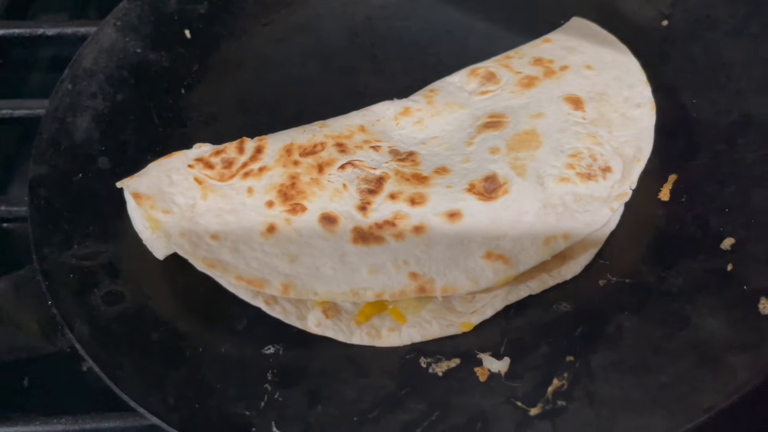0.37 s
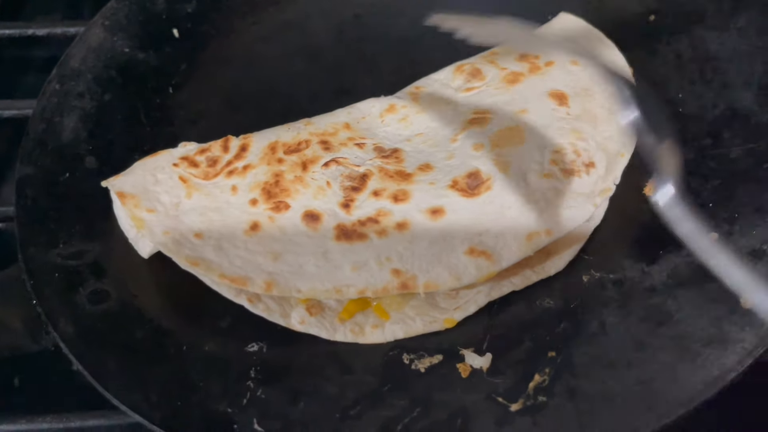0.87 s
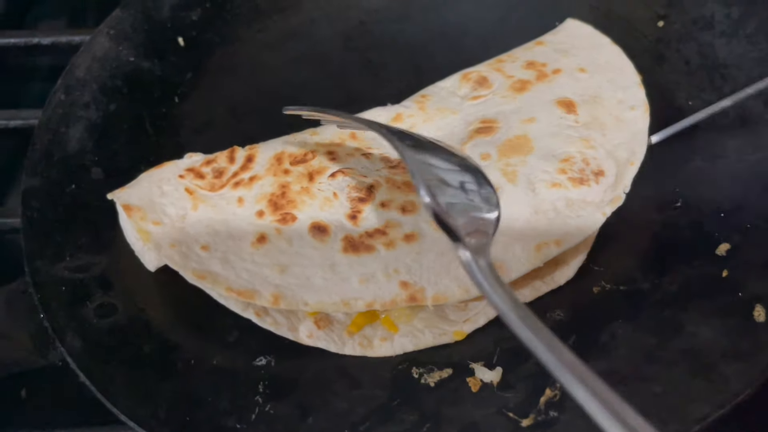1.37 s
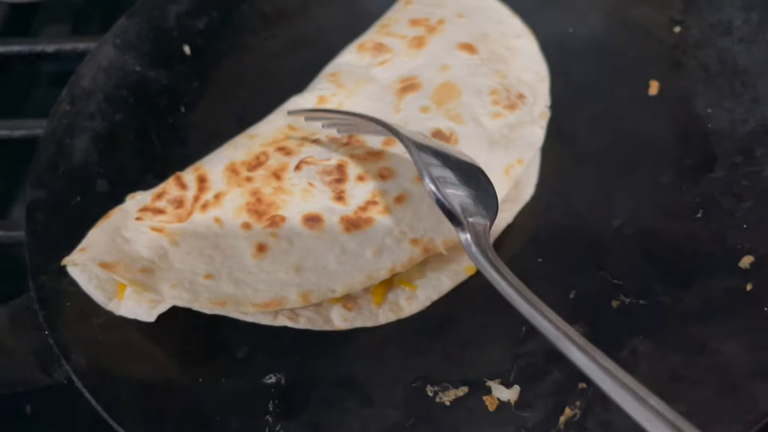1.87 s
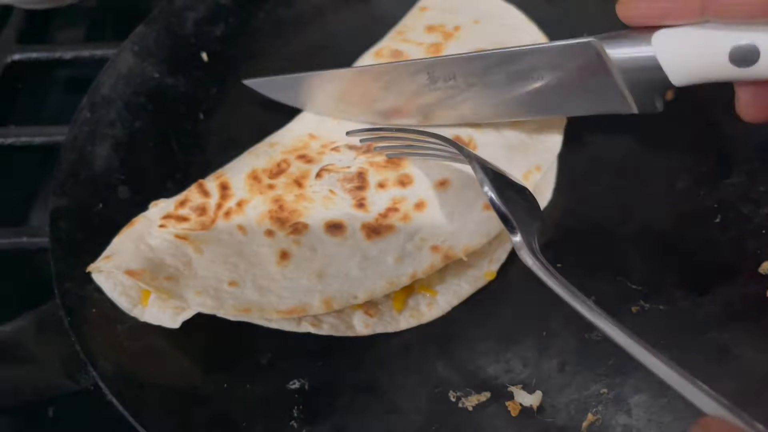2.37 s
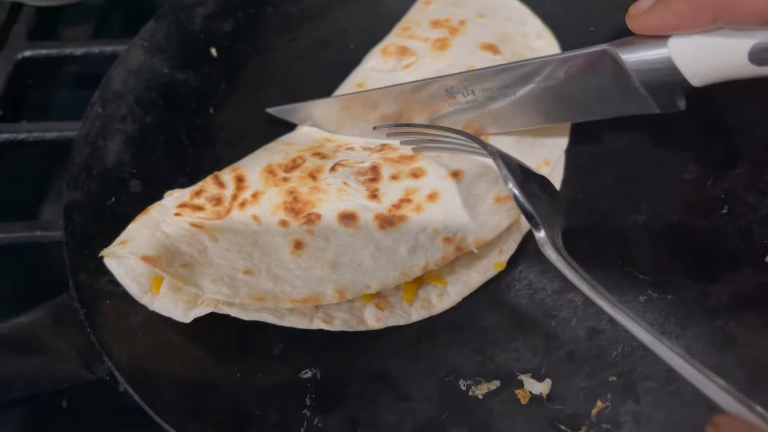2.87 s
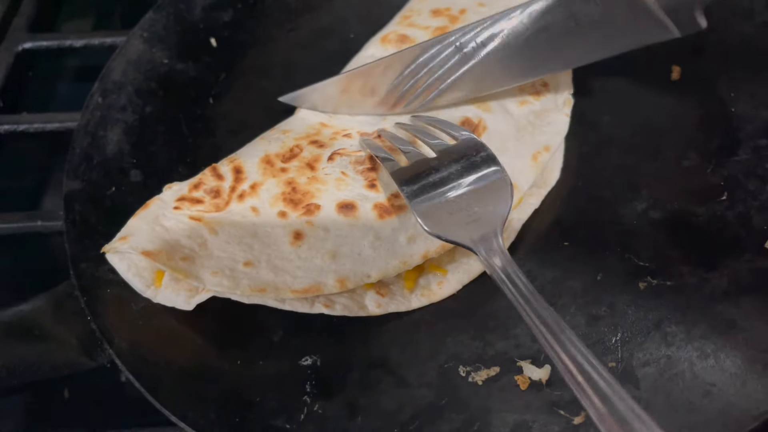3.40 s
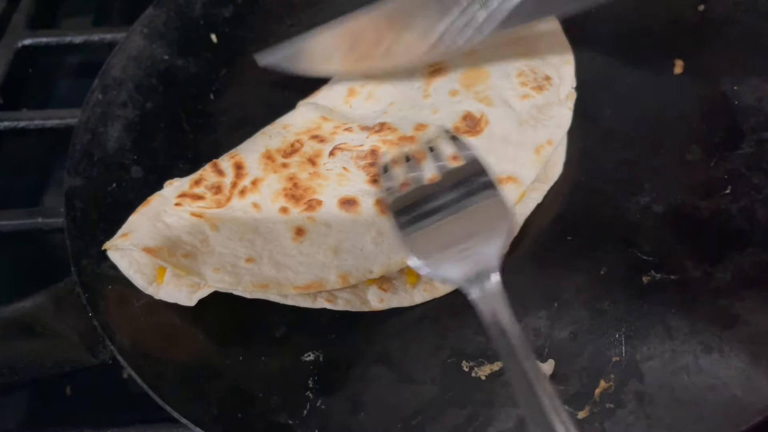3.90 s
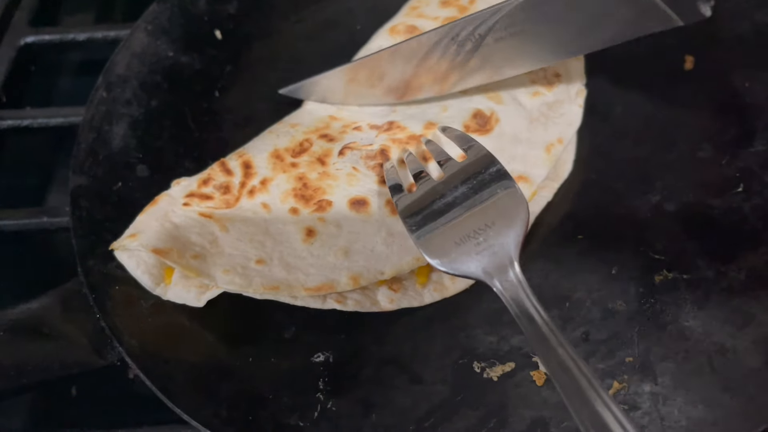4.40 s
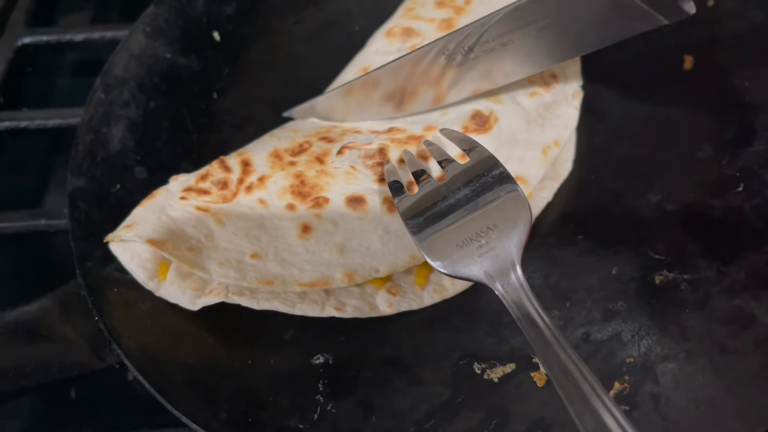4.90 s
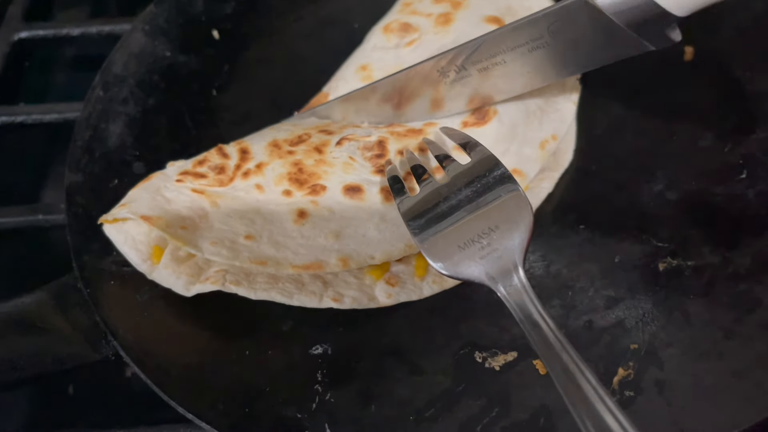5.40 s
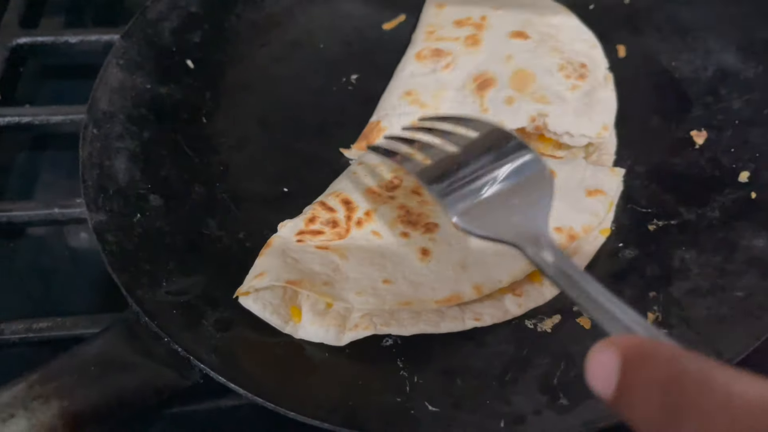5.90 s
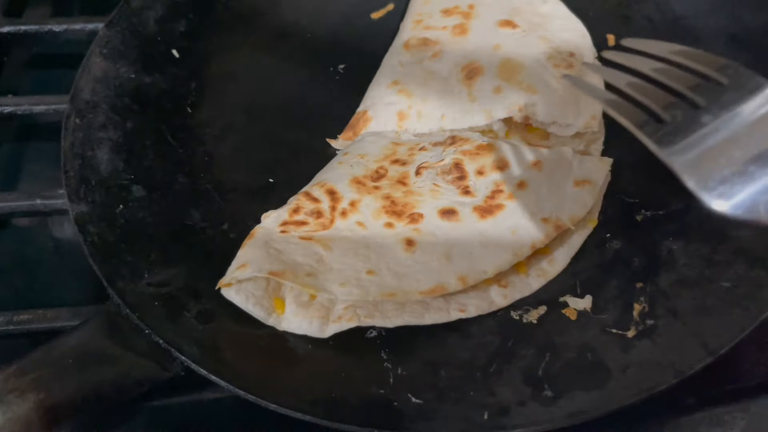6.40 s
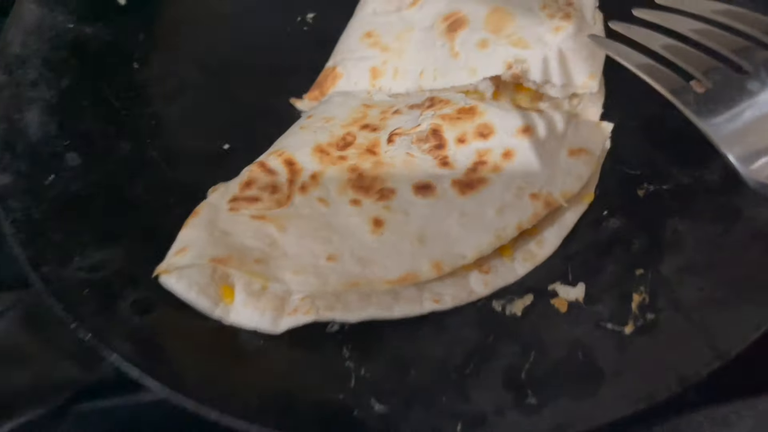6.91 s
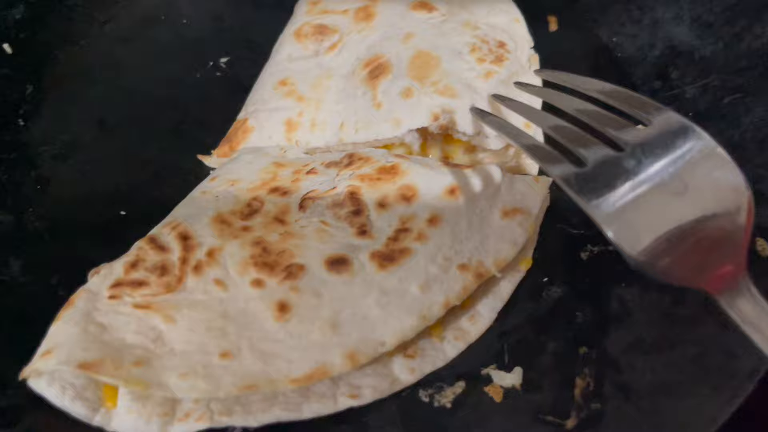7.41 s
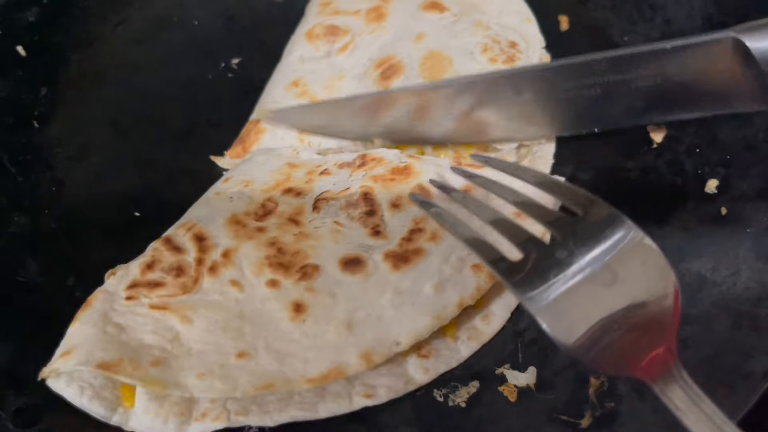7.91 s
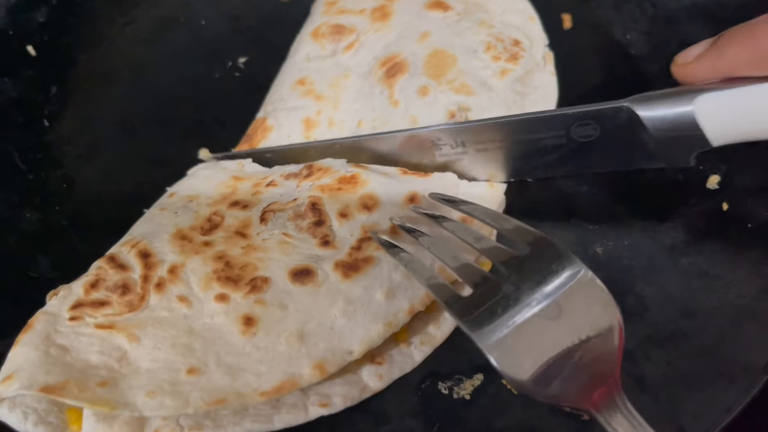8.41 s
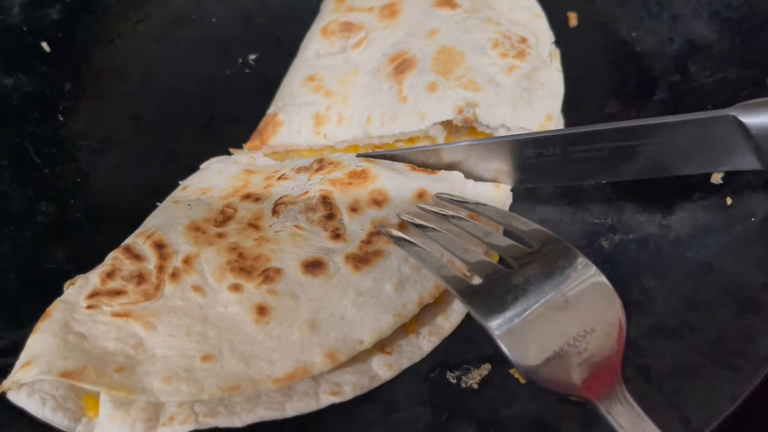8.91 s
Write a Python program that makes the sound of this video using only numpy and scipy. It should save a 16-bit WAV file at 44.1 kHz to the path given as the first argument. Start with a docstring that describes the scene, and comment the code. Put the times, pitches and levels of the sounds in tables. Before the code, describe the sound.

Close up in a quiet kitchen, a knife and fork saw crusty flatbread on an iron pan, with clicks, scrapes, thumps and loud ringing taps.

```python
"""In a quiet kitchen, heard from close by, a knife and fork work on a crisp flatbread in a flat iron pan.
The blade knocks, taps and drags on the iron: blows and tiny uneven slips make its many modes ring.
It saws the crust and clicks on the fork in the same two ways; a few thin squeaks are fluttering sines.
The pan judders on its grate with a deep thump; soft low puffs of noise, rumble, hum and hiss lie below.
At one moment the ringing of the cutlery and pan, the puffs and the echoes so far stop short."""
import sys
import numpy as np
from scipy import signal
from scipy.fft import rfft, irfft, next_fast_len
from scipy.io import wavfile
from scipy.ndimage import uniform_filter1d

SR = 44100
rng = np.random.default_rng(int(sys.argv[2]) if len(sys.argv) > 2 else 0)


def unload_wav(signal):
    """Save mono or channel-first audio to the path in sys.argv[1] as 16-bit WAV at rate SR, clipped to [-1, 1]."""
    wavfile.write(
        sys.argv[1],
        SR,
        np.round(np.clip(np.atleast_2d(signal).T, -1, 1) * 32767).astype(np.int16),
    )


def field_ratio(decibels):
    """Amplitude ratio for a level in dB (20 dB per decade); scalars and array-likes work."""
    return 10 ** (np.asarray(decibels, dtype=float) / 20)


N = 398223
T = np.arange(N) / SR
CUT_S = 5.709  # the moment when ringing stops short

# Levels in these tables are those before the room, the ports and the overall colour.
# background treble over time: t/s, hiss level/dB, fizz level/dB
TREBLE_LEVEL = [(0.0, -60.5, -62.5), (0.2, -61, -58.5), (0.34, -66.5, -60.5), (1.18, -70.5, -63),
                (1.72, -77.5, -72), (2.3, -69.5, -73), (3.099, -70.5, -72), (3.949, -76, -73),
                (4.599, -76, -72.5), (5.24, -60.5, -63), (5.7, -77.5, -72.5), (5.721, -78.5, -88),
                (6.139, -77.5, -67.5), (6.3, -80, -80), (7.3, -79.5, -77.5), (7.902, -81, -81)]
# colour of the low rumble: f/Hz, relative level/dB
RUMBLE_COLOUR = [(15, -35), (25, -18), (54, -1.5), (102, -7.5), (229, -2.5), (386, -13.5), (409, -12.5),
                 (515, -17.5), (674, -26.5), (900, -30), (1730, -45), (2230, -54), (2500, -56), (3250, -83),
                 (5500, -120)]
# colour of the hiss: f/Hz, relative level/dB
HISS_COLOUR = [(300, -3.5), (1000, -9), (1600, -11.5), (2300, -5.5), (4000, -9.5), (6500, -3),
               (8000, -10.5), (11000, -31.5)]
# hum tones, before they waver: f/Hz, rms level/dB
HUM_TONES = [(51, -62.5), (392, -72.5)]
# how alike the background is left and right: f/Hz, likeness (0 to 1)
LIKENESS = [(60, 0.29), (130, 0.98), (290, 0.79), (640, 0.14), (1410, 0.16), (3100, 0.43), (6820, 0.24),
            (15000, 0.087)]
# modes of the pan rocking on its grate: f/Hz, relative level/dB, time to fall 60 dB/s
GRATE_MODES = [(164.7, 8.5, 0.077), (266, 1, 0.29), (328, 2, 0.17), (393, -2, 0.075), (475, -12, 0.088),
               (586, -4.5, 0.11), (732, -26, 0.17), (826, -11.5, 0.27), (992, -14.5, 0.16)]
# jolts of the pan on the grate: peak t/s, rise/s, fall/s, judder level/dB
GRATE_JOLTS = [(5.154, .03, 0.12, -62), (5.294, 0.0043, 0.12, -40), (5.587, 0.013, 0.058, -32),
               (5.684, 0.0049, 0.034, -32), (5.748, .005, 0.16, -50.5), (5.934, 0.0068, 0.13, -49),
               (6.112, .006, 0.14, -51), (6.36, .2, 0.037, -67.5), (6.522, 0.081, .4, -63.5),
               (6.928, .11, 0.073, -59), (7.051, 0.023, 0.023, -48.5)]
# deep thump while the pan slides: t/s, level/dB
THUMP_LEVEL = [(5.1, -87), (5.154, -47.5), (5.26, -65.5), (5.299, -49), (5.42, -43), (5.58, -64),
               (5.66, -54), (5.83, -65), (5.93, -56), (6.3, -61.5), (6.449, -64), (6.85, -53.5), (7.0, -56),
               (7.07, -72), (7.14, -59.5), (7.3, -56.5), (7.341, -87.5)]
# soft low puffs, the body of a knock and of pan taps, and dull bumps: t/s, peak level/dB, centre f/Hz
LOW_PUFFS = [(1.204, -37, 328.7), (5.745, -46, 1240), (5.935, -47, 1230), (6.11, -50, 1250),
             (6.553, -49, 474), (6.572, -48, 538), (6.649, -58, 533), (6.729, -58.5, 444),
             (6.894, -55.5, 810), (7.023, -64.5, 515), (7.054, -53, 509), (7.438, -54.5, 520)]
# faint squeaks, level before flutter: start t/s, length/s, f/Hz, level/dB
SQUEAK_TONES = [(0.123, 0.19, 5510, -56.5), (0.224, 0.12, 4780, -64), (1.65, 0.06, 4950, -61),
                (3.64, 0.062, 5600, -64), (3.79, 0.034, 9140, -54.5), (3.84, 0.054, 9120, -55),
                (3.878, 0.02, 4800, -55), (4.195, 0.043, 4930, -55), (4.2, 0.043, 8370, -59),
                (4.27, 0.055, 5020, -59), (4.275, 0.071, 9200, -62), (7.541, 0.094, 879, -66.5)]
# modes of the cutlery, before each use shortens them: f/Hz; relative level/dB; time to fall 60 dB/s
STEEL_HZ = [1270, 1440, 2299, 3100, 3806, 4920, 6830, 8290, 9090, 11386, 11445, 12255, 13040, 14700]
STEEL_DB = [5, -6.5, -18, -7, -9.5, -6, -6, -11, -3.5, -5, 7, -19, -5.5, 6]
STEEL_T60 = [0.019, 0.063, 0.057, 0.045, 0.076, 0.065, 0.041, 0.22, 0.099, 0.079, 0.033, 0.24, 0.41, 0.1]
# modes of the iron pan, before each use shortens them: f/Hz; relative level/dB; time to fall 60 dB/s
PAN_HZ = [250, 335, 400, 600, 711, 822, 1000, 1290, 1420, 2014, 2369, 2560, 2830, 3143, 3216, 3381, 3682,
          3811, 4220, 4359, 4410, 4705, 5235, 5453, 5566, 6315, 6923, 7230, 7458, 7518, 7566, 8030, 8390,
          8689, 9998, 11060, 11343, 11745, 11910, 12040, 12800, 13290]
PAN_DB = [-31.5, -19.5, -28, -29, -14.5, -15.5, -21, -25, -27.5, -12.5, -10.5, -7.5, -8.5, -9.5, -10, -27.5,
          -11, -11.5, -20.5, -9.5, -14.5, -15.5, -3.5, -24.5, -19, -19, -14, -19, -15, -14, -10.5, -14, -17,
          -12, 5.5, -21.5, -3, -5, -14.5, -16.5, -17, -3.5]
PAN_T60 = [0.12, 0.13, .15, 0.5, 0.082, 0.15, .08, 0.051, 0.09, 0.19, 0.068, 0.15, 0.094, 0.089, .1, 0.13,
           .16, .12, 0.059, 0.097, .1, 0.18, 0.064, 0.13, 0.079, 0.12, .07, .06, 0.075, .1, 0.1, .1, 0.12,
           .1, 0.036, .12, 0.044, 0.021, .06, 0.063, 0.065, 0.068]
# colour of the gritty noise in rubbing: f/Hz, relative level/dB
GRIT_COLOUR = [(300, -32.5), (700, -5.5), (1300, 1.5), (1800, -5.5), (2600, 1), (5000, -1), (8000, -9),
               (16000, -13.5)]
# a drag also lifts modes above the favoured one: frequency ratio, share of the lift
OVERTONE_LIFTS = [(1.72, .6), (2.06, 0.36)]
# blade strokes and fork presses on the crust: peak t/s, rise/s, fall/s, dull level/dB, bright level/dB
CRUST_STROKES = [(2.145, 0.0089, 0.11, -65.5, -74), (2.35, 0.011, 0.034, -59, -75),
                 (2.439, 0.04, 0.045, -54.5, -51.5), (2.598, 0.015, 0.054, -62, -59.5),
                 (2.645, 0.011, .06, -49, -52), (2.7, 0.042, 0.037, -52.5, -52.5),
                 (2.89, 0.023, 0.045, -72, -66.5), (3.078, 0.031, 0.079, -61, -55),
                 (3.195, 0.06, .04, -63, -60), (3.286, 0.088, 0.09, -49.5, -47.5),
                 (3.36, .035, 0.043, -54.5, -49), (3.58, 0.063, 0.063, -67.5, -64),
                 (3.66, 0.045, 0.13, -54, -58), (3.8, 0.064, 0.099, -57, -54.5),
                 (3.866, 0.05, 0.049, -63, -57), (4.04, .015, 0.024, -62, -62.5),
                 (4.127, 0.014, 0.024, -60.5, -58), (4.215, .025, 0.034, -59.5, -54),
                 (4.294, 0.038, 0.032, -61, -55.5), (4.675, .008, 0.033, -71, -72),
                 (4.801, .012, 0.058, -57.5, -62), (4.835, .022, 0.15, -67, -70),
                 (4.932, 0.066, 0.03, -64, -63.5), (5.089, 0.0099, 0.038, -55, -62),
                 (5.06, 0.04, .03, -58.5, -69), (5.19, 0.0096, 0.027, -53.5, -60),
                 (5.237, 0.045, 0.023, -58, -46.5), (5.309, 0.04, .13, -59, -55),
                 (5.546, 0.053, .08, -56, -48.5), (5.64, 0.11, 0.071, -58.5, -54),
                 (5.689, 0.022, 0.079, -46.5, -62), (6.04, 0.033, 0.039, -75, -69),
                 (6.2, 0.12, .1, -83, -62.5), (7.07, .025, 0.046, -73, -67)]
# stretches of work on the crust: start t/s, end t/s
CRUST_TIMES = [(2.13, 5.709), (6.0, 6.36), (7.0, 7.15)]
# cutlery resting on the crust, before the cut: dull, middle and bright level/dB
RESTING_LEVEL = [-77.5, -75, -82]
# blade dragged over iron, one table a drag: t/s, level/dB, favoured mode f/Hz, its lift/dB
BLADE_DRAGS = [
    [(1.21, -32, 2850, 25), (1.258, -40, 2760, 13), (1.314, -28, 2590, 22), (1.42, -34, 2480, 14.5),
     (1.49, -25, 2550, 21), (1.548, -41, 2710, -1.5), (1.644, -46, 2870, 0.5), (1.7, -79, 2570, 10)],
    [(7.95, -90, 3010, 3), (7.975, -62.5, 2760, 3), (8.078, -40, 2330, 7), (8.146, -40.5, 2720, 3),
     (8.208, -58, 2540, 15), (8.308, -44.5, 2630, 19), (8.37, -54, 2770, 7)],
    [(8.66, -79.5, 3360, 18), (8.712, -54, 3240, 13), (8.798, -49.5, 3000, -3), (8.864, -50, 2540, 5),
     (8.966, -67, 2870, -1), (8.996, -50.5, 2730, 3), (9.03, -49, 2940, 20)],
]
# tone of each drag: dull over middle level/dB, bright over middle level/dB, grit over ringing level/dB
DRAG_TONE = [(-12.5, 0.5, -6.5), (-10, -3, 4.5), (-13, 2, -7)]
# clicks of cutlery and breaking crust:
# t/s, peak level/dB, treble slope/(dB per octave), favoured mode f/Hz, crack over ring level/dB
CUTLERY_CLICKS = [(0.3705, -48.5, 3, 11500, -2), (0.5394, -51.5, -3, 11400, -3.5),
                  (1.6454, -31, -2.5, 8400, -3), (2.1347, -40.5, -13.5, 1217, -4.5),
                  (2.3486, -46.5, -13, 1393, -7), (2.5948, -49, -4.5, 9200, -6),
                  (2.6368, -31.5, -1, 1440, 0), (2.6693, -34.5, -4.5, 11830, -5),
                  (2.9796, -46, -9.5, 1270, 1.5), (2.9919, -20.5, 0, 2299, -1.5),
                  (3.1916, -36, -3.5, 3100, 11), (3.3398, -26, -5.5, 1430, 4),
                  (3.3882, -42, -10.5, 1270, -10), (3.5334, -47.5, -11, 9160, -1.5),
                  (3.5603, -47, -7.5, 1440, 0), (4.018, -33.5, -6.5, 1313, 4), (4.6064, -47, 4.5, 11630, 4),
                  (4.6699, -38, -5, 5500, 25.5), (4.775, -46, -12, 1440, 1), (4.7904, -34.5, -3, 10970, 4),
                  (4.8186, -40, -13, 1540, 3.5), (4.8403, -36.5, -9.5, 1440, -1),
                  (5.0264, -41.5, -7, 1510, -1), (5.0822, -39.5, -2, 1870, -8), (5.1825, -32.5, 0, 1440, 9),
                  (5.2273, -33, 1, 10370, 10), (5.292, -39.5, -24, 1260, 11), (5.3225, -45.5, -5, 12100, 5),
                  (5.378, -38.5, -1, 11500, 19), (5.5193, -43.5, -13, 1800, 12),
                  (5.533, -35, -18.5, 2300, 5), (5.5523, -25, -5, 11600, 4), (5.5634, -24, 31, 13300, -19),
                  (5.6506, -46, -24, 11400, 5), (5.7084, -36.5, -7, 1120, -3), (5.985, -51, 3.5, 4920, 13),
                  (7.0536, -49.5, -4, 1110, 7), (7.33, -60.5, -11.5, 2299, 15),
                  (7.438, -57.5, -10, 1270, 4), (7.8214, -49.5, 4, 11220, 7.5),
                  (8.6153, -45.5, -1, 2930, 19), (8.9491, -34, 3, 12000, 22), (8.972, -52, -7, 4920, 5)]
# knocks, soft taps and large slips of the drag, all ringing the pan:
# t/s, peak level/dB, treble slope/(dB per octave), favoured mode f/Hz, crack over ring level/dB
PAN_STRIKES = [(1.2027, -8.5, -2.5, 2730, -7), (1.2214, -17, -4, 2490, -4.5),
               (1.297, -21.5, -2.5, 2560, -17), (1.33, -22, -2.5, 2540, -2.5),
               (1.362, -27.5, 4.5, 2630, -12), (1.3976, -29, 0.5, 2500, 2), (1.4735, -17, 5.5, 2560, -5),
               (5.5844, -37, -29, 2480, -15), (5.682, -42, -19.5, 2560, -13),
               (5.7448, -37.5, -18, 2830, -15), (5.9344, -40.5, -24, 2830, -17),
               (6.109, -51.5, -21, 2830, -15), (7.9374, -43.5, -6.5, 3720, -8),
               (8.3714, -35.5, -7, 2520, 3), (8.3814, -1, 2, 3100, -5), (8.3964, -2, -1, 3340, -2),
               (8.4074, -6.5, 0.5, 2840, -9), (8.991, -36, -6.5, 2670, 11.5)]
# left port ahead of right: f/Hz, phase/rad
LEFT_LEADS = [(0, 0.5), (1640, -0.2), (2330, 0.96), (3620, 0.91), (5250, 1.5), (5600, -7), (6030, 0.82),
              (8870, 0.52), (9820, -2.5), (12500, -6.5), (13200, -7.5), (14400, -14), (14900, -8.5),
              (16200, -6.5)]
# left port louder than right: f/Hz, level/dB
LEFT_LOUDER = [(60, 1), (110, 8.5), (200, -3.5), (380, 5), (700, 5.5), (1290, 2), (2380, 5), (4400, 2),
               (8120, 1.5), (15000, -1)]
# overall colour, with a notch near 10 kHz, a peak near 11 kHz and a steep treble fall: f/Hz, level/dB
OVERALL_COLOUR = [(8500, -1.5), (9750, 0), (10050, -11.5), (10350, -16.5), (10700, 5.5), (11500, 3.5),
                  (12700, -3.5), (13600, -29), (14900, -16), (15700, -22), (16400, -63)]


def evened(x):
    """Scales a sound to an rms of 1."""
    return x / np.sqrt(np.mean(x ** 2) + 1e-20)


def read(points, hz):
    """Reads a table between its points, along a log frequency scale."""
    f, value = np.transpose(points)
    return np.interp(np.log(hz + 1), np.log(f + 1), value)


def coloured(x, points):
    """Makes each frequency louder or softer by the dB in a table."""
    size = next_fast_len(x.shape[-1] + 4096)
    gain = field_ratio(read(points, np.fft.rfftfreq(size, 1 / SR)))
    return irfft(rfft(x, size) * gain, size)[..., :x.shape[-1]]


def band(x, lo_hz, hi_hz):
    """Keeps mainly the frequencies between two edges."""
    return signal.sosfilt(signal.butter(3, [lo_hz, hi_hz], "band", fs=SR, output="sos"), x)


def wander(shape, samples):
    """Slow random drift with an rms of 1: noise averaged twice."""
    once = uniform_filter1d(rng.standard_normal(shape), int(samples))
    return evened(uniform_filter1d(once, int(samples)))


def hump(t, peak_s, rise_s, fall_s, power):
    """Level in dB around a peak: 18.5 dB down after the rise or fall time."""
    flank_s = np.where(t < peak_s, rise_s, fall_s)
    return -18.5 * abs((t - peak_s) / flank_s) ** power


def ring(hz, db, t60, length=SR // 3):
    """One dying sine a mode, as rows, roughened by a close and shorter-lived neighbour."""
    t = np.arange(length) / SR
    hz, db, t60 = (np.asarray(c)[:, None] for c in (hz, db, t60))
    start, other, apart = rng.random((3, *hz.shape))
    near_hz = 240 * (apart - 0.5)  # up to 120 Hz off
    neighbour = np.sin(2 * np.pi * ((hz + near_hz) * t + other))
    neighbour *= 0.9 * field_ratio(-220 * t - 12 * t / t60)
    return field_ratio(db - 60 * t / t60) * (np.sin(2 * np.pi * (hz * t + start)) + neighbour)


def favour(hz, favoured_hz, db, octaves):
    """The spot of contact moves most in the modes near one frequency."""
    distance = np.log2(np.asarray(hz)[:, None] / favoured_hz) / octaves
    return field_ratio(db * np.exp(-distance ** 2))


def add(mix, s, sound):
    """Mixes a sound in; if it began before the cut, it stops there."""
    end = round(CUT_S * SR) if s < CUT_S else N
    part = mix[round(s * SR):end][:len(sound)]
    part += sound[:len(part)]


def ports(x):
    """The two microphone ports hear a near source with their own phase and level."""
    size = next_fast_len(N + 4096)
    hz = np.fft.rfftfreq(size, 1 / SR)
    half = field_ratio(read(LEFT_LOUDER, hz) / 2) * np.exp(0.5j * read(LEFT_LEADS, hz))
    return irfft(rfft(x, size) * np.array([half, 1 / half]), size)[:, :N]


def walls(x, t60=0.42):
    """A short scattered echo, different in each ear, that stops short at the cut."""
    t = np.arange(SR // 2) / SR
    noise = rng.standard_normal((2, len(t))) * field_ratio(-60 * t / t60)
    tail = band(noise * (t > 0.004), 200, 9500)
    tail /= np.linalg.norm(tail[0])
    echo = np.zeros((2, N))
    for part in (T < CUT_S, T >= CUT_S):
        echo += signal.oaconvolve((x * part)[None], tail, axes=1)[:, :N] * part
    return echo


def kitchen():
    """Low rumble with a wavering hum, a hiss and a finer fizz, partly alike left and right."""
    s, *treble = np.transpose(TREBLE_LEVEL)
    hiss_db, fizz_db = (np.interp(T, s, db) for db in treble)
    rumble_db = -59 + 1.4 * wander(N, 9000)
    size = next_fast_len(N)
    same = np.clip(read(LIKENESS, np.fft.rfftfreq(size, 1 / SR)), 0, 1)
    z = rfft(rng.standard_normal((2, 2, size)))  # layer, then ear
    z[:, 1] = same * z[:, 0] + np.sqrt(1 - same ** 2) * z[:, 1]
    low, high = irfft(z, size)[..., :N]
    waver = wander(N, 5000)
    hum = np.zeros(N)
    for hz, db in HUM_TONES:
        tone = np.sqrt(2) * np.sin(2 * np.pi * hz * T + 0.5 * waver)
        hum += field_ratio(db + 1.5 * waver) * tone
    rumble = evened(coloured(low, RUMBLE_COLOUR)) * field_ratio(rumble_db)
    hiss = evened(coloured(high, HISS_COLOUR)) * field_ratio(hiss_db)
    fizz = evened(band(high, 7100, 16000)) * field_ratio(fizz_db)
    return hum + rumble + hiss + fizz


def pan_shift():
    """Judder of iron on iron drives the low modes and a deep thump of the stove top."""
    judder = rng.standard_normal(N) * (rng.random(N) < 900 / SR)  # about 900 impulses a second
    modes = ring(*np.transpose(GRATE_MODES)).sum(0)
    low = evened(band(signal.oaconvolve(judder, modes)[:N], 109, 1420))
    deep = evened(band(judder, 55, 110))
    t = T[::40]
    low_db = np.max([db + hump(t, *when, 0.97) for *when, db in GRATE_JOLTS], 0)
    s, deep_db = np.transpose(THUMP_LEVEL)
    return low * field_ratio(np.interp(T, t, low_db)) + deep * field_ratio(np.interp(T, s, deep_db, -120, -120))


def low_puffs():
    """Dull puffs of fading noise around a centre, with no ringing modes."""
    out, t = np.zeros(N), np.arange(SR // 4) / SR
    for s, peak_db, hz in LOW_PUFFS:
        fading = rng.standard_normal(len(t)) * field_ratio(-60 * t / 0.2)  # 60 dB down in 0.2 s
        puff = band(fading, hz / 2.05, hz * 1.4)
        add(out, s, field_ratio(peak_db) * puff / abs(puff).max())
    return out


def squeaks():
    """Thin tones that swell, flutter in level and phase, and fade."""
    out = np.zeros(N)
    for s, length, hz, db in SQUEAK_TONES:
        t = np.arange(round(length * SR)) / SR
        flutter = wander((2, len(t)), 150)
        tone = np.sin(2 * np.pi * hz * t + 0.33 * flutter[1])
        add(out, s, field_ratio(db + 3.3 * flutter[0]) * tone * np.hanning(len(t)))
    return out


def blows(events, hz, db, t60, rise_s, favour_db, octaves, rattle, crack_s, size):
    """Each event is a ring of the modes with a short crack of noise and a fading rattle."""
    out, t = np.zeros(N), np.arange(size) / SR
    for s, peak_db, slope_db, favoured_hz, crack_db in events:
        slope = slope_db * np.log2(np.maximum(hz, 3000) / 3000)
        weight = field_ratio(slope + 2.5 * rng.standard_normal(len(hz)))
        weight *= favour(hz, favoured_hz, favour_db, octaves)[:, 0]
        short_t60 = np.multiply(t60, rng.uniform(0.75, 1.0, len(hz)))  # each ring keeps a random share
        tone = weight @ ring(hz, db, short_t60, size) * (1 - np.exp(-t / rise_s))
        tilt = [(150, -29.5), (400, -11), (1200, -8.0), (3000, -5.5), (12000, 2 * slope_db)]  # f/Hz, level/dB
        fade = np.exp(-t / crack_s) + rattle * np.exp(-t / 0.032)
        crack = coloured(rng.standard_normal(len(t)) * fade, tilt)
        sound = tone / abs(tone).max() + field_ratio(crack_db) * crack / abs(crack).max()
        end_fade = np.minimum(4 * (1 - t / t[-1]), 1)
        add(out, s, field_ratio(peak_db) * sound / abs(sound).max() * end_fade)
    return out


def friction(strokes, hz, db, t60, damping, grit_db, slips_per_s, spread_db, smooth, lumps_db, drift_db):
    """Tiny uneven slips over a smooth rub shake the modes, which swell and fade as the contact travels."""
    out = np.zeros(N)
    for rows, stroke_grit_db in zip(strokes, np.broadcast_to(grit_db, len(strokes))):
        s, *columns = np.transpose(rows)
        t = np.arange(s[0], s[-1], 1 / SR)
        dull_db, middle_db, bright_db, *spot = (np.interp(t, s, c) for c in columns)

        slip_size = field_ratio(spread_db * np.minimum(rng.exponential(1, len(t)), 2.8))
        slips = slip_size * (rng.random(len(t)) < slips_per_s / SR)
        rub = evened(slips * rng.standard_normal(len(t))) + smooth * rng.standard_normal(len(t))
        rub *= field_ratio(lumps_db * wander(len(t), 460))

        # each mode drifts in level, in steps of 100 samples
        drift = np.repeat(wander((len(hz), len(t) // 100 + 1), 12), 100, 1)[:, :len(t)]
        drive = rub * field_ratio(drift_db * drift)
        if spot:
            favoured_hz, lift_db = spot
            drive *= favour(hz, favoured_hz, lift_db, 0.065)
            for ratio, share in OVERTONE_LIFTS:
                drive *= favour(hz, ratio * favoured_hz, share * lift_db, 0.04)

        # the pressing blade shortens the ring
        pressed = ring(hz, db, damping * np.array(t60), SR // 8)
        modes = signal.oaconvolve(drive, pressed, axes=1)[:, :len(t)].sum(0)
        # evens the summed ringing over about 2500 samples
        modes /= np.sqrt(abs(uniform_filter1d(modes ** 2, size=2500)) + 1e-12)
        body = evened(modes) + field_ratio(stroke_grit_db) * evened(coloured(rub, GRIT_COLOUR))

        sound = field_ratio(dull_db) * evened(band(body, 300, 2000))
        sound += field_ratio(middle_db) * evened(band(body, 2000, 8000))
        sound += field_ratio(bright_db) * evened(band(body, 8000, 16000))
        edges = np.clip(np.minimum(t - s[0], s[-1] - t) / 0.006, 0, 1)
        add(out, s[0], sound * edges)
    return out


def cutlery_clicks():
    """Clicks of cutlery and breaking crust ring the steel modes."""
    return blows(CUTLERY_CLICKS, STEEL_HZ, STEEL_DB, STEEL_T60, rise_s=0.000085, favour_db=14.5,
                 octaves=0.054, rattle=0.06, crack_s=0.0034, size=7000)


def crust_sawing():
    """Slips on the crust shake the cutlery; the loudest stroke at each moment, or resting, sets each band."""
    peak_s, rise_s, fall_s, dull_db, bright_db = np.transpose(CRUST_STROKES)[..., None]
    middle_db = dull_db + 0.52 * (bright_db - dull_db) - 3  # a mix of dull and bright, 3 dB softer
    strokes = []
    for start, end in CRUST_TIMES:
        s = np.linspace(start, end, round((end - start) * 500))
        shape_db = hump(s, peak_s, rise_s, fall_s, 1.96)
        lifted_db = -30 if start > CUT_S else 0  # resting is far softer after the cut
        levels = [np.maximum((db + shape_db).max(0), rest_db + lifted_db)
                  for db, rest_db in zip((dull_db, middle_db, bright_db), RESTING_LEVEL)]
        strokes.append(np.transpose([s] + levels))
    return friction(strokes, STEEL_HZ, STEEL_DB, STEEL_T60, damping=0.373, grit_db=0.5, slips_per_s=2500,
                    spread_db=6.0, smooth=0.72, lumps_db=1.5, drift_db=8.0)


def blade_drags():
    """The dragged blade slips over the iron and shakes the pan; three bands follow each drag's level."""
    strokes = []
    for rows, (dull_db, bright_db, _) in zip(BLADE_DRAGS, DRAG_TONE):
        s, db, hz, lift_db = np.transpose(rows)
        # the dull band follows only a share of the swings around -39.5 dB
        dull = -39.5 + 0.71 * (db + 39.5) + dull_db
        strokes.append(np.transpose([s, dull, db, db + bright_db, hz, lift_db]))
    return friction(strokes, PAN_HZ, PAN_DB, PAN_T60, damping=0.59, grit_db=np.transpose(DRAG_TONE)[2],
                    slips_per_s=5600, spread_db=0.5, smooth=0.71, lumps_db=-0.5, drift_db=5.5)


def pan_strikes():
    """Knocks, soft taps and large slips of the drag ring the many modes of the iron pan."""
    return blows(PAN_STRIKES, PAN_HZ, PAN_DB, PAN_T60, rise_s=0.00038, favour_db=9,
                 octaves=0.088, rattle=0.13, crack_s=0.0056, size=12000)


def scene():
    """Near sounds through the ports and the walls, over the background."""
    background = kitchen()
    low = pan_shift() + low_puffs()  # bass arrives alike at both ports
    near = squeaks() + cutlery_clicks() + crust_sawing() + blade_drags() + pan_strikes()
    return ports(near) + low + field_ratio(-20) * walls(near + low) + background


def band_limit(x):
    """A steep low-pass at the top of the band."""
    return signal.sosfilt(signal.butter(12, 16640, fs=SR, output="sos"), x)


def record(dry):
    """Gives the whole mix its overall colour: a notch near 10 kHz and a steep treble fall."""
    mix = coloured(dry, OVERALL_COLOUR)
    return band_limit(mix)


dry = scene()
out = record(dry)
unload_wav(out)
```